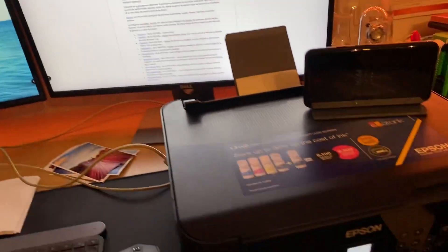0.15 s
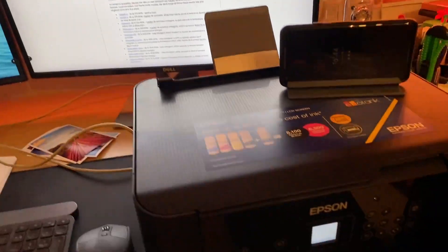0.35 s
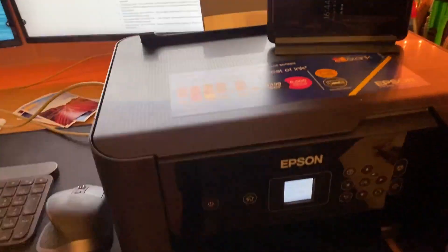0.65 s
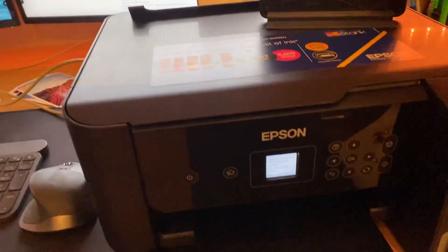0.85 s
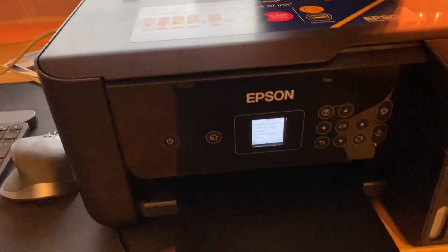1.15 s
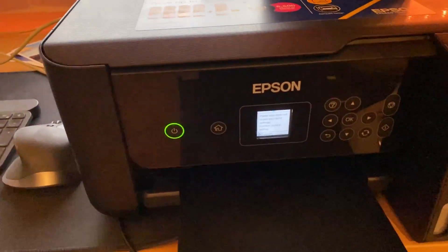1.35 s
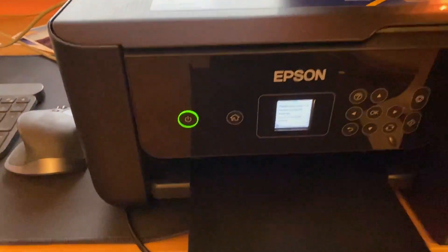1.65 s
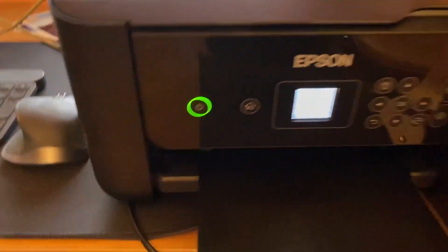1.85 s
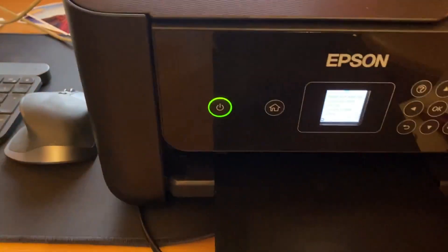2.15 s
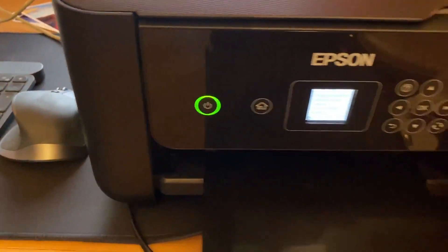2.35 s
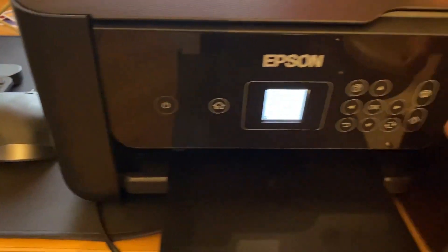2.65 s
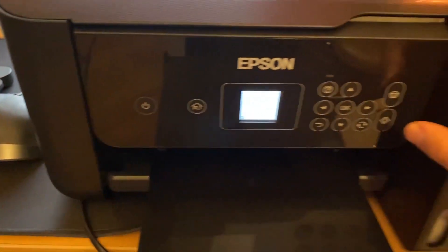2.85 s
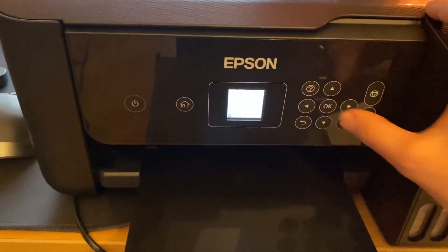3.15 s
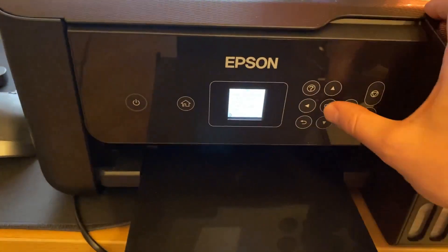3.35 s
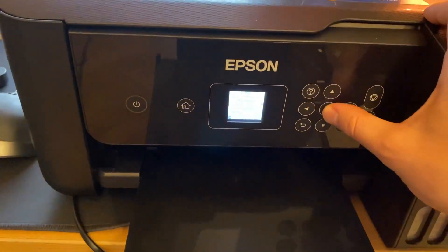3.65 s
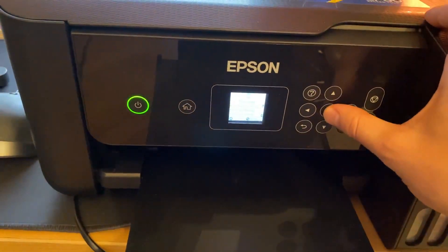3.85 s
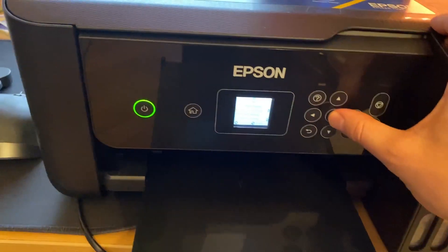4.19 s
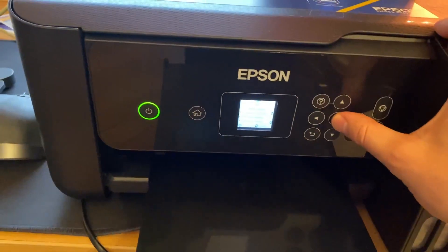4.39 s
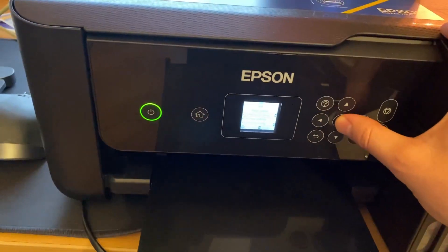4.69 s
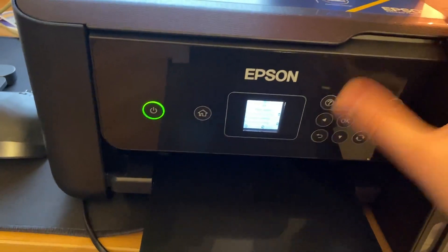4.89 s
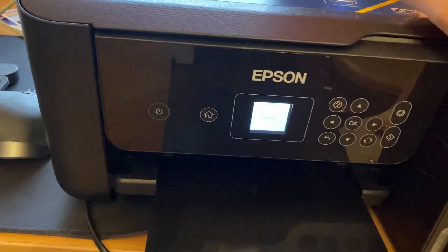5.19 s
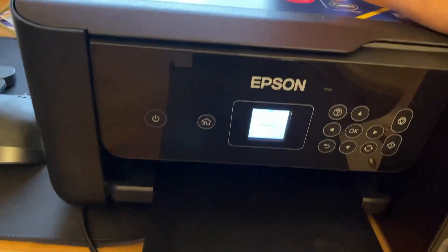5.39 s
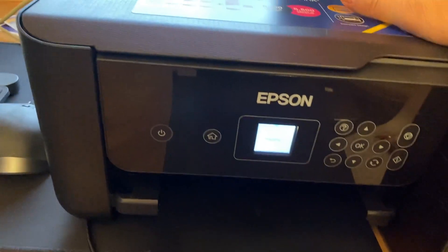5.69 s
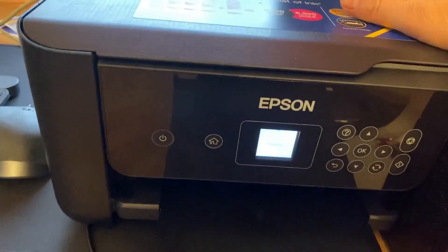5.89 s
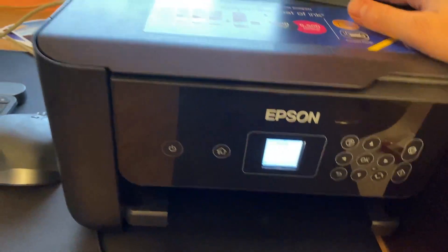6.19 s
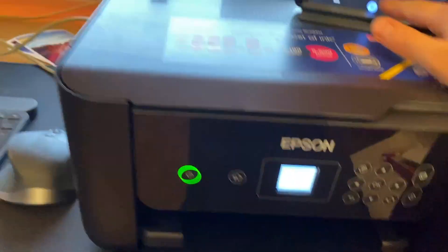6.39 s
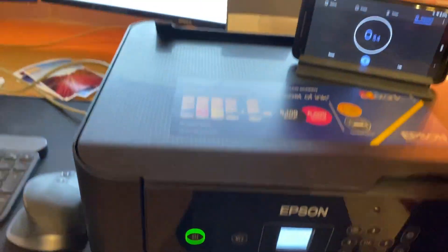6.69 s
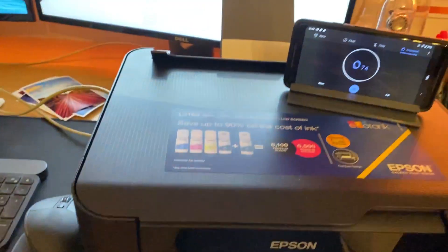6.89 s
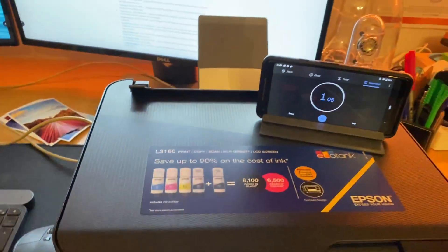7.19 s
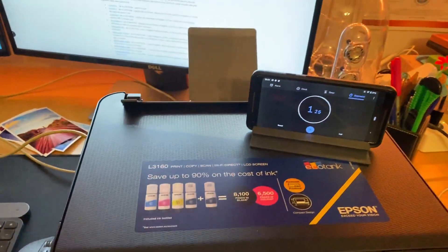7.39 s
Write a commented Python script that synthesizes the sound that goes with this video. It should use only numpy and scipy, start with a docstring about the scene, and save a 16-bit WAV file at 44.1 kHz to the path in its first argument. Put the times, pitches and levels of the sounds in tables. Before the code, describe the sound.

An inkjet printer gets ready to print, heard close by and slightly to the left in a small room with a low, steady rumble. A faint high motor whine opens. From about 0.6 to 1.2 seconds the gears turn in short runs while levers knock and rattle in the plastic case, loudest at 1 second. A lull follows, with soft carriage sliding and a few small clicks around 2.6 seconds. A latch snaps sharply twice near 3.7 seconds and three times just before 5 seconds, leading into another burst of gears and knocks that fades by 5.6 seconds. The thin, high whine holds from about 5.3 to 6.7 seconds with a few faint ticks. Then the gears creep off quietly and, at about 7.1 seconds, break into a loud, clattering run lasting until around 7.5 seconds.

```python
"""An inkjet printer on a desk gets ready to print, heard from close by in a small room.
The motor drive whines faintly, then the gear train turns in short runs while levers knock and rattle
in the plastic case. The carriage slides softly; a latch snaps twice near 3.7 s and three times just
before 5 s, as the gears turn again. The drive whines at a standstill until the gears creep off at
6.7 s and break into a last, clattering run. A low room rumble lies under it all."""
import sys
import numpy as np
from scipy import signal
from scipy.fft import rfft, irfft, next_fast_len
from scipy.io import wavfile

SR = 44100
rng = np.random.default_rng(int(sys.argv[2]) if len(sys.argv) > 2 else 0)


def to_wav(s):
    """Save 16-bit WAV."""
    ch = np.atleast_2d(s).T  # columns
    pcm = np.round(np.clip(ch, -1, 1) * 32767)  # PCM
    wavfile.write(sys.argv[1], SR, pcm.astype(np.int16))


N = 332514
TIME = np.arange(N) / SR
FREQS = np.fft.rfftfreq(N, 1 / SR)

# tone of rattling parts: (frequency [Hz], level [dB])
RATTLE_TONE = [(50, -21.5), (120, -31), (260, -3.5), (600, 11), (1250, 10), (2200, 3.5), (3400, 1.5),
               (5000, -6), (7200, -6.5), (8500, -18.5), (10000, -7.5), (12200, -20.5), (13700, -13),
               (16000, -27)]
# modes of the plastic case: (frequency [Hz], level [dB], t60 [s])
CASE_MODES = [(256, -21, 0.17), (293.7, -14, 0.25), (472, -11.5, 0.11), (556, -53, 0.26), (714, -6, 0.088),
              (793.4, -8, 0.15), (1088, -15.5, 0.045), (1338, -1.5, 0.044), (1800, -47, 0.057),
              (1824, -32, 0.17), (2400, -6, .1), (2750, -24.5, .09), (3390, -35, 0.033), (3470, -9, 0.061),
              (4840, -3, 0.047), (7250, -17, .05)]


def knocks(rise_s=0.0017, thump_db=-21):
    """Each knock rattles, brighter the harder the parts, and thumps; the case rings along."""
    # levers, carriage and a tapping finger: (time [s], level [dB], hardness [dB], rattle decay [s])
    hits = [(0.627, -32, -2.5, 0.0084), (.647, -36, -2, 0.013), (.68, -39.5, -3.5, 0.016),
            (.853, -37.5, -13, 0.0033), (1.025, -17, -2, 0.0073), (1.071, -23.5, 4, 0.0035),
            (1.197, -28, -17, 0.009), (1.208, -27.5, -8.5, 0.0056), (1.221, -46.5, 3, 0.009),
            (2.152, -62, 1, .01), (2.56, -46.5, -9.5, 0.0037), (2.607, -35, 0.5, 0.0035),
            (3.097, -45.5, -16, 0.0059), (3.547, -37, -4, .005), (4.932, -29.5, -6.5, 0.0023),
            (4.977, -43, -1, .003), (5.037, -25.5, -4, .01), (5.079, -27.5, -1, 0.0067),
            (5.157, -37, -4.5, 0.011), (5.177, -26, -15, 0.0054), (5.24, -37.5, -3, 0.024),
            (5.264, -32.5, -2, 0.0096), (5.277, -25.5, -4, 0.0039), (5.442, -38.5, -18, 0.0077),
            (5.567, -47, -22, .009), (5.587, -38.5, -17.5, 0.01), (5.64, -45, -6.5, .017),
            (6.24, -59, -12.5, 0.0068), (6.354, -62, -2, 0.023), (6.474, -53, -12.5, 0.026),
            (6.584, -51.5, -9, 0.01), (6.744, -53, -3, 0.0045), (7.073, -23.5, -3, 0.016),
            (7.106, -25, -6, 0.014), (7.112, -21, 5.5, 0.0074), (7.145, -18, -2.5, .013),
            (7.171, -29, -1, 0.02), (7.274, -22, -6, .009), (7.284, -22, -1.5, 0.0093),
            (7.301, -30.5, 4, 0.033), (7.354, -27, 3.5, 0.013), (7.372, -36, 3, 0.021),
            (7.521, -34, 4, 0.0053)]
    # brightness of hard parts: (frequency [Hz], gain [dB per dB of hardness])
    hardness_tilt = [(1400, 0.5), (2700, 1), (5000, 1.84), (8000, 2.24)]
    # parts reaching their stops only thump: (time [s], level [dB])
    stops = [(.647, -39), (0.681, -37.5), (1.2, -45.5), (1.636, -52), (3.309, -49), (5.255, -35),
             (5.643, -46), (6.354, -53.5), (6.744, -49.5), (6.965, -47), (7.113, -37), (7.296, -33.5),
             (7.372, -32)]
    out, t, hz = np.zeros((2, N)), np.arange(SR // 5) / SR, np.fft.rfftfreq(1024, 1 / SR)
    for start, db, hardness, decay in hits:
        body = minimum_phase(curve(RATTLE_TONE, hz) + hardness * curve(hardness_tilt, hz))
        add(out, start, amp(db) * signal.fftconvolve(rattle(t, decay, rise_s), body[None]))
        add(out, start, amp(db + thump_db) * thump(t))
    for start, db in stops:
        add(out, start, amp(db) * thump(t))
    return ring(out, CASE_MODES, ring_db=-40)


def latch(flex_s=0.00032, tick_decay_s=.001, tick_edge_hz=11000):
    """The latch lets go with a tick; its panel flexes for a cycle or two, rebounds and rattles."""
    # (time [s], level [dB], pitch [Hz], tick [dB], rebound delay [s], rebound [dB], rattle [dB]);
    # tick, rebound and rattle are relative to the snap's level
    snaps = [(3.626, -16.5, 1200, -8, 0.0041, -16.5, -21), (3.7423, -21.5, 960, -41, .0034, -15.5, -29),
             (4.8078, -19, 1200, -9, .003, -15.5, -29.5), (4.9145, -24.5, 1000, -24, .003, -3.5, -20),
             (4.9944, -19.5, 1010, -18, .0017, 7, -1.5)]
    # the small panel that carries the latch: (frequency [Hz], level [dB], t60 [s])
    panel_modes = [(642, -6, 0.092), (936, -4, 0.047), (1303, -31, 0.17), (1463, -37, 0.059),
                   (4600, -39, .08)]
    out, t, hz = np.zeros((2, N)), np.arange(SR // 10) / SR, np.fft.rfftfreq(1024, 1 / SR)
    swing = (t / flex_s / 2) ** 2 * np.exp(2 - t / flex_s)
    body = minimum_phase(curve(RATTLE_TONE, hz))[None]
    lowpass = signal.butter(2, tick_edge_hz, fs=SR, output="sos")
    for start, db, pitch, tick_db, delay, rebound_db, rattle_db in snaps:
        flex = amp(db) * swing * np.sin(2 * np.pi * pitch * (t - 2 * flex_s))
        tick = signal.sosfilt(lowpass, rattle(t, tick_decay_s, rise_s=0.00017))
        add(out, start, flex + amp(db + tick_db) * tick)
        add(out, start + delay, amp(rebound_db) * flex)
        add(out, start, amp(db + rattle_db) * signal.fftconvolve(rattle(t, decay_s=0.0058), body))
    return ring(out, panel_modes, ring_db=-39.5)


def rattle(t, decay_s, rise_s=0.00084, grit_db=3):
    """Loose parts chatter: tiny impacts that die away."""
    noise = rng.standard_normal((2, len(t)))
    grit = np.repeat(rng.standard_normal(len(t)), 32)[:len(t)]  # a new level every 32 samples
    return stereo(unit(noise * amp(grit_db * grit))) * (1 - np.exp(-t / rise_s)) * np.exp(-t / decay_s)


def thump(t, band_hz=(205, 350), rise_s=0.0068, decay_s=0.02):
    """The chassis answers a blow slowly and low."""
    bandpass = signal.butter(2, band_hz, "band", fs=SR, output="sos")
    boom = unit(signal.sosfilt(bandpass, rng.standard_normal(len(t))))
    return boom * (1 - np.exp(-t / rise_s)) * np.exp(-t / decay_s)


def ring(x, modes, ring_db):
    """Every blow sets the modes of the struck part ringing."""
    t = np.arange(SR // 3) / SR
    tones = sum(amp(db - 60 * t / t60) * np.sin(2 * np.pi * hz * t) for hz, db, t60 in modes)
    return x + amp(ring_db) * signal.fftconvolve(x, tones[None])[:, :N]


def gears(tooth_hz=555, tooth_depth=0.23, shudder_db=1, ticks_per_s=110, tick_db=17, gain_db=-2.5):
    """Tooth after tooth scrapes and strikes; backlash makes the run shudder and tick."""
    # runs of the gear train, most easing off as they go: (start [s], length [s], level [dB], sag [dB/s])
    runs = [(0.62, 0.053, -42.5, 70), (0.75, 0.23, -60.5, -5), (1.017, 0.17, -40, 29),
            (4.989, 0.38, -35.5, 68), (5.252, 0.019, -42, 40), (5.312, 0.077, -52, 52),
            (6.736, .33, -54, -6), (7.068, 0.23, -37, 5), (7.262, .27, -32.5, 24)]
    # tone of the scraping teeth: (frequency [Hz], level [dB])
    scrape_tone = [(35, -31.5), (60, -14), (135, -12.5), (309, -3), (458, -3.5), (551, 2), (875, -7),
                   (1080, -6.5), (1210, -7), (1670, -8.5), (8230, -35.5), (10400, -35), (12200, -46),
                   (15000, -39)]
    # the frame hums while the gears turn: (frequency [Hz], width [Hz], level against the scrape [dB])
    frame_hum = [(305, 36, -9)]
    teeth = 1 + tooth_depth * np.cos(2 * np.pi * np.cumsum(tooth_hz * (1 + 0.02 * drift(18))) / SR)
    contact = rng.standard_normal((2, N)) * teeth * amp(shudder_db * drift(70))
    ticks = amp(tick_db) * rng.standard_normal((2, N)) * (rng.random(N) < ticks_per_s / SR)
    scrape = ring(colour(contact + ticks, amp(curve(scrape_tone, FREQS))), CASE_MODES, ring_db=-41)
    drives = [stroke(start, length, db, -sag, attack_s=.008, release_s=.028)
              for start, length, db, sag in runs]
    return amp(gain_db) * (unit(scrape) + bands(frame_hum)) * np.max(drives, axis=0)


def mesh_note(note, harmonics, gain_db, swell_db_per_s, waver, start_flat=0.12, spin_up_s=0.0311):
    """Meshing teeth sing a wavering note that rises as the motor comes up to speed."""
    start, length, hz = note
    speed = 1 - start_flat * np.exp(-np.maximum(TIME - start, 0) / spin_up_s)
    angle = 2 * np.pi * np.cumsum(hz * speed * (1 + waver * drift(59.2))) / SR
    tone = sum(amp(db + 2 * drift(30)) * np.sin(order * angle) for order, db in harmonics)
    return tone * stroke(start, length, gain_db, swell_db_per_s, attack_s=0.016, release_s=0.022)


def gear_notes():
    """The gears sing softly as they creep, then louder in the last run."""
    # notes of the mesh: (start [s], length [s], fundamental at full speed [Hz])
    creep_note = (6.8, .225, 250.5)
    run_note = (7.09, .45, 277)
    # their harmonics: (multiple of the fundamental, level [dB])
    creep_harmonics = [(1, -4), (4, 1), (5, -2)]
    run_harmonics = [(2, 1.5), (4, -4), (6, -28)]
    creep = mesh_note(creep_note, creep_harmonics, gain_db=-60, swell_db_per_s=12, waver=0.0079)
    return creep + mesh_note(run_note, run_harmonics, gain_db=-53, swell_db_per_s=24, waver=0.019)


def sway():
    """Each lurch of the carriage rocks the chassis on its feet."""
    # carriage lurches: (start [s], length [s], level [dB])
    lurches = [(5.232, 0.037, -43), (7.3, 0.057, -40)]
    # resonance of the chassis on its feet: (frequency [Hz], width [Hz], level [dB])
    rocking = [(105.5, 40, 2.5)]
    push = sum(stroke(*lurch, 0, attack_s=0.082, release_s=0.045) for lurch in lurches)
    return bands(rocking) * push


def carriage(uneven_db=1):
    """The carriage glides along its rail with a fine hiss."""
    # moves along the rail: (start [s], length [s], level [dB], swell [dB/s])
    glides = [(0.474, 0.52, -77, 19.5), (2.337, 0.1, -78.5, 8), (2.734, 0.22, -67, -34),
              (3.068, .25, -73.5, 32.5), (5.178, .3, -73, 18), (5.47, 0.19, -74.5, -8),
              (6.49, 0.1, -74, -6.5), (6.728, 0.29, -62.5, 5), (7.2, 0.44, -69, 32)]
    # tone of the sliding: (frequency [Hz], level [dB])
    rail_tone = [(500, -1), (1500, 1), (3000, 1.5), (6000, 2), (8300, -5), (10200, 4), (12200, -8),
                 (13800, 3.5), (16000, -5)]
    motion = np.max([stroke(*glide, attack_s=0.055, release_s=0.019) for glide in glides], axis=0)
    hiss = colour(rng.standard_normal((2, N)), amp(curve(rail_tone, FREQS)))
    return hiss * motion * amp(uneven_db * drift(39.3))


def motor_whine(chop_hz=1440.3, gain_db=2, left_lead_s=7e-6, waver_db=3, fade_s=0.011):
    """A pulse wave in the motor coils: its duty cycle decides which harmonics sound."""
    # the chopped current holds its load: (start [s], end [s], level [dB], duty cycle [0-1])
    holds = [(0, .51, -79, .088), (5.3, 5.69, -82, .135), (5.69, 6.03, -77, .122),
             (6.03, 6.38, -68.5, .113), (6.38, 6.73, -75.5, .06)]
    # tone of the whine: (frequency [Hz], level [dB])
    coil_tone = [(4320, -26.5), (5760, -17.5), (7200, -21), (8640, -42), (10080, -7.5), (11520, 3),
                 (12960, -4), (14400, -16)]
    out, orders = np.zeros((2, N)), np.arange(3, 11)[:, None]
    hz = orders * chop_hz
    for start, end, db, duty in holds:
        t = TIME[round(start * SR):round((end + fade_s) * SR)]
        heights = np.sqrt(2) * amp(db + curve(coil_tone, hz)) * np.sin(np.pi * orders * duty)
        tone = np.array([(heights * np.sin(2 * np.pi * hz * (t + lead))).sum(0)
                         for lead in (left_lead_s, 0)])
        fade = np.clip(np.minimum(t - start, t[-1] - t) / fade_s, 0, 1)
        add(out, start, tone * fade)
    return out * amp(gain_db + waver_db * np.array([drift(14), drift(4.8)]))


def sizzle(whistle_hz=6035):
    """A thin whistle over two bands of hiss comes twice with the whine."""
    # sizzles: (start [s], length [s], level [dB], relative whistle level [dB])
    bursts = [(5.377, .24, -81.5, 2), (6.45, 0.12, -81, -10.5)]
    # bands of the hiss: (frequency [Hz], width [Hz], level [dB])
    hiss_bands = [(3520, 450, 0.5), (4420, 310, -3)]
    hiss = bands(hiss_bands)
    whistle = np.sin(2 * np.pi * np.cumsum(whistle_hz + 8 * drift(60)) / SR)
    return sum((hiss + amp(whistle_db) * whistle)
               * stroke(start, length, db, 0, attack_s=0.045, release_s=0.045)
               for start, length, db, whistle_db in bursts)


def room(x, wet_db=-10, desk_db=-9, desk_decay_s=0.0056):
    """Quick reflections from desk and case, then a short tail that lingers in the bass."""
    # decay of the room: (frequency [Hz], t60 [s])
    decay_times = [(100, 0.99), (500, 0.21), (1500, 0.23), (5000, 0.25), (14000, 0.22)]
    t = np.arange(SR // 2) / SR
    hz, frames, spectra = signal.stft(stereo(rng.standard_normal((2, len(t)))), SR, nperseg=256)
    spectra *= amp(-60 * frames / curve(decay_times, hz)[:, None])
    tail = signal.istft(spectra, SR, nperseg=256)[1][:, :len(t)] * (t > .006)
    early = stereo(rng.standard_normal((2, len(t)))) * np.exp(-t / desk_decay_s) * (t > .0015)
    echoes = amp(wet_db) * tail / np.linalg.norm(tail[0])
    echoes += amp(desk_db) * early / np.linalg.norm(early[0])
    return x + signal.fftconvolve(x, echoes, axes=1)[:, :N]


def place_left(x):
    """The printer stands a little to the left: louder there, and one sample earlier."""
    # stereo balance: (frequency [Hz], left minus right [dB])
    balance = [(200, 0.5), (1300, 0.5), (2400, 1.5), (4400, 4.5), (8100, 1), (15000, -1)]
    size = next_fast_len(N + SR)
    hz = np.fft.rfftfreq(size, 1 / SR)
    pan = amp(np.array([[.5], [-.5]]) * curve(balance, hz))
    lag = np.exp(-2j * np.pi * hz * np.array([[0], [1]]) / SR)
    return irfft(rfft(x, size) * pan * lag, size)[:, :N]


def room_tone(rumble_db=-60.5, swell_db=0.7):
    """Low room rumble with a few soft hums."""
    # tone of the rumble: (frequency [Hz], level [dB])
    rumble_tone = [(15, -26), (25, -8.5), (54, -0.5), (135, -6), (320, -12.5), (520, -17.5), (780, -20.5),
                   (1100, -30.5), (1450, -30.5), (2900, -40.5), (5000, -44.5), (9000, -52), (15000, -57.5)]
    # hums of the room: (frequency [Hz], width [Hz], level [dB])
    hums = [(54.7, 30, -64.5), (108.6, 3.9, -70), (196.4, 21, -65.5), (376.8, 18, -73), (1876, 400, -80.5)]
    rumble = colour(rng.standard_normal((2, N)), amp(curve(rumble_tone, FREQS)))
    return rumble * amp(rumble_db + swell_db * drift(4.7)) + bands(hums)


def stroke(start, length, db, swell_db_per_s, attack_s, release_s):
    """Envelope of one movement: it gets going, swells or sags while driven, then coasts to rest."""
    t = TIME - start
    driven = np.clip(t / attack_s, 0, 1) * amp(db + swell_db_per_s * np.clip(t, 0, length))
    return driven * np.exp(-np.maximum(t - length, 0) / release_s)


def stereo(x):
    """Two unrelated channels become a stereo image: narrow in the bass, wide in the low treble."""
    # stereo width: (frequency [Hz], left-right likeness [0-1])
    likeness = [(60, 0.96), (290, 0.86), (640, 0.45), (1400, 0.394), (3100, 0.15), (7000, 0.19),
                (15000, 0.93)]
    a, b = rfft(x)
    same = np.clip(curve(likeness, np.fft.rfftfreq(x.shape[1], 1 / SR)), 0, 1)
    mid, side = np.sqrt((1 + same) / 2) * a, np.sqrt((1 - same) / 2) * b
    return irfft(np.array([mid + side, mid - side]), x.shape[1])


def colour(x, gain):
    """A stereo sound of rms 1, equalised by a gain per frequency."""
    return unit(irfft(rfft(stereo(x)) * gain, N))


def bands(rows):
    """Noise held in narrow resonances."""
    return sum(amp(db) * colour(rng.standard_normal((2, N)), 1 / (1 + (2 * (FREQS - hz) / width) ** 2))
               for hz, width, db in rows)


def minimum_phase(db):
    """The quickest impulse response with this dB spectrum."""
    log_gain = np.log(amp(np.r_[db, db[-2:0:-1]]))
    return np.fft.ifft(np.exp(np.conj(signal.hilbert(log_gain)))).real


def drift(rate_hz):
    """A smooth random wobble of rms 1."""
    return unit(irfft(rfft(rng.standard_normal(N)) * np.exp(-(FREQS / rate_hz) ** 2), N))


def curve(points, hz):
    """Joins (Hz, value) points on a log-frequency axis."""
    f, value = np.transpose(points)
    return np.interp(np.log(hz + 1), np.log(f + 1), value)


def add(mix, start_s, sound):
    """Mixes a sound in at its start time."""
    part = mix[:, round(start_s * SR):][:, :sound.shape[-1]]
    part += sound[..., :part.shape[1]]


def amp(db):
    """Decibels to gain."""
    return 10 ** (np.asarray(db) / 20)


def unit(x):
    """Scales to rms 1."""
    return x / np.sqrt(np.mean(x ** 2) + 1e-20)


def scene():
    """Blows, gears and carriage sound in the room, over the whine of the drive and the room's rumble."""
    mechanism = room(knocks() + latch() + gears() + carriage())
    printer = mechanism + gear_notes() + motor_whine() + sizzle() + sway()
    return place_left(printer) + room_tone()


def record(dry, edge_hz=15500):
    """A steep low-pass trims the very top."""
    lowpass = signal.firwin(511, edge_hz, window=("kaiser", 9), fs=SR)
    return signal.oaconvolve(dry, lowpass[None], "same")


dry = scene()
out = record(dry)
to_wav(out)
```